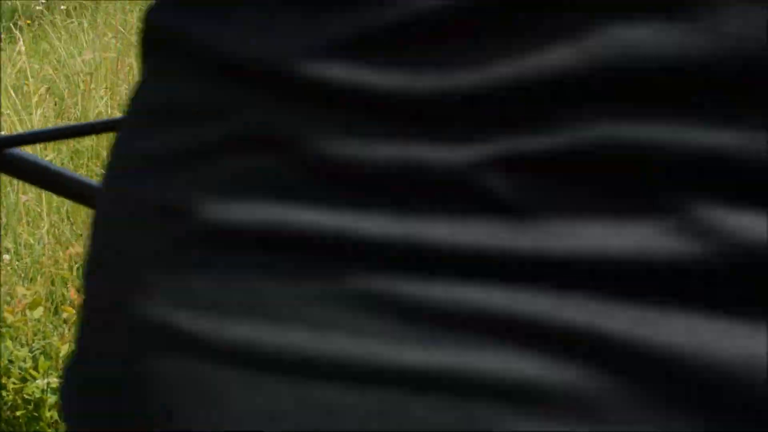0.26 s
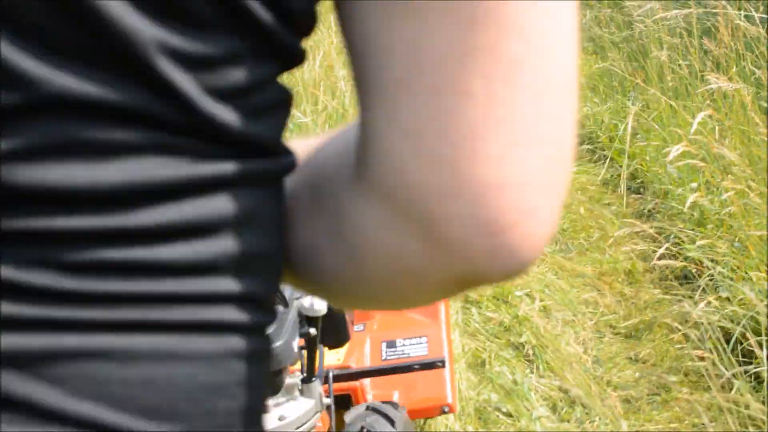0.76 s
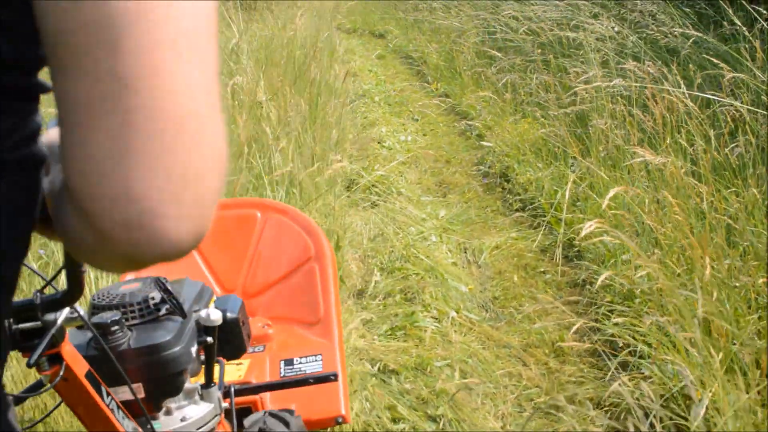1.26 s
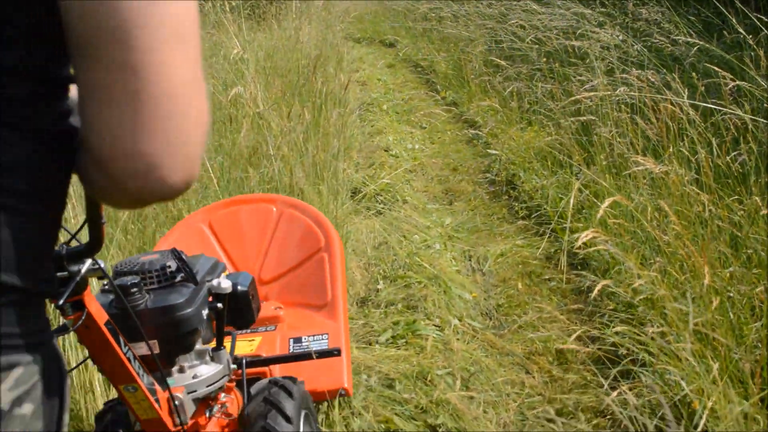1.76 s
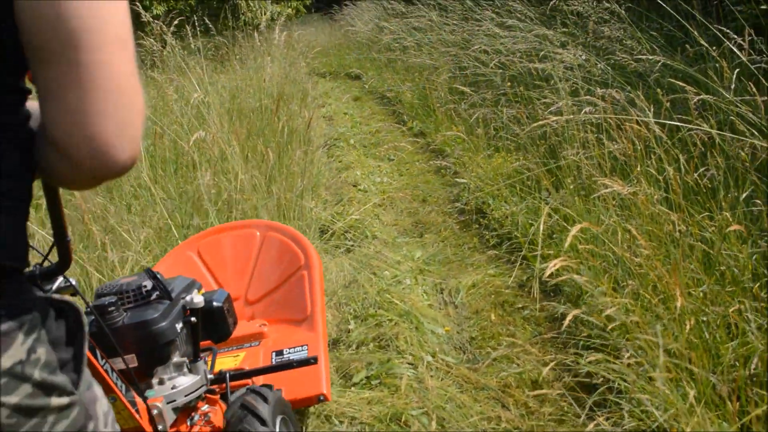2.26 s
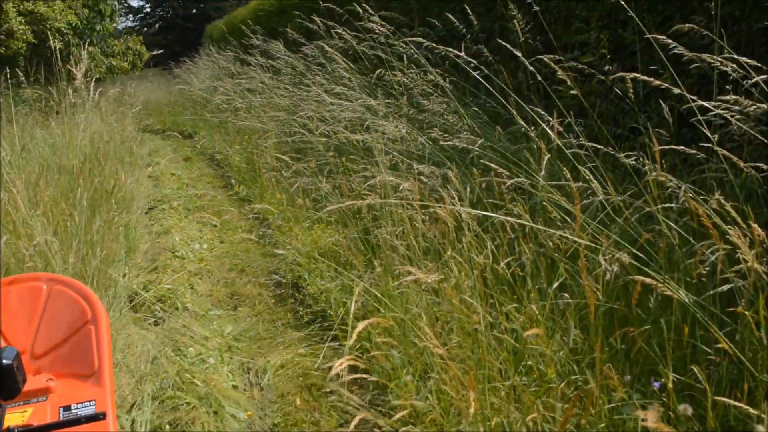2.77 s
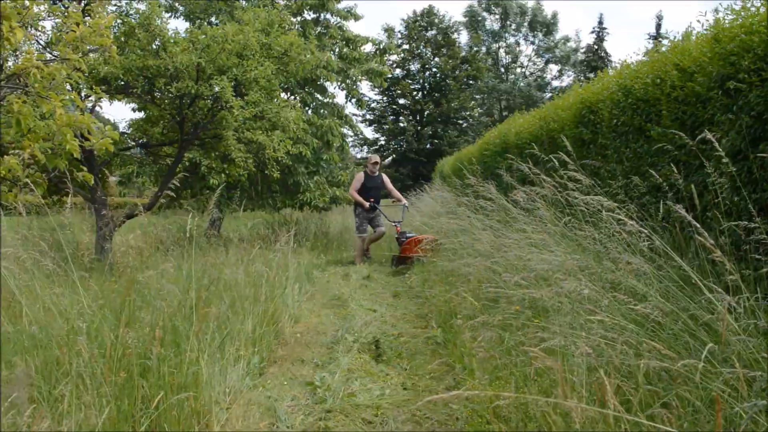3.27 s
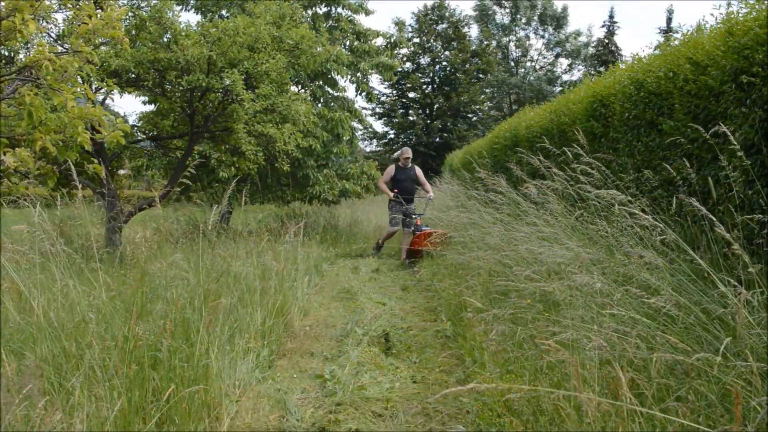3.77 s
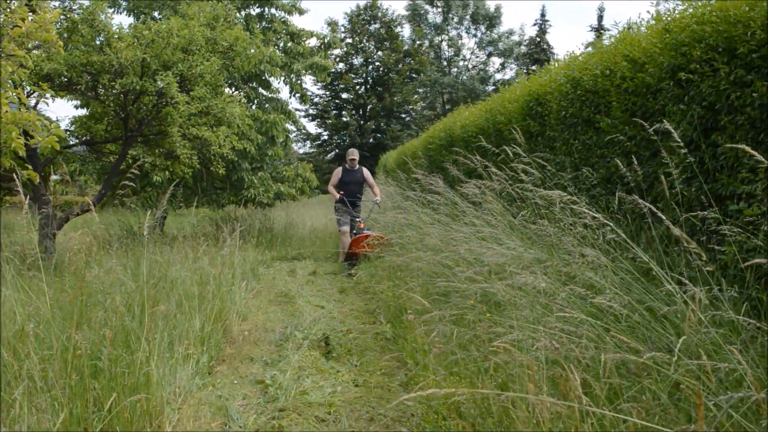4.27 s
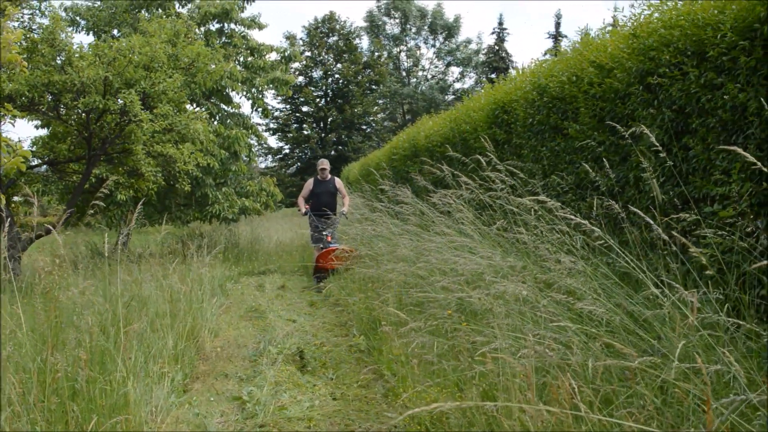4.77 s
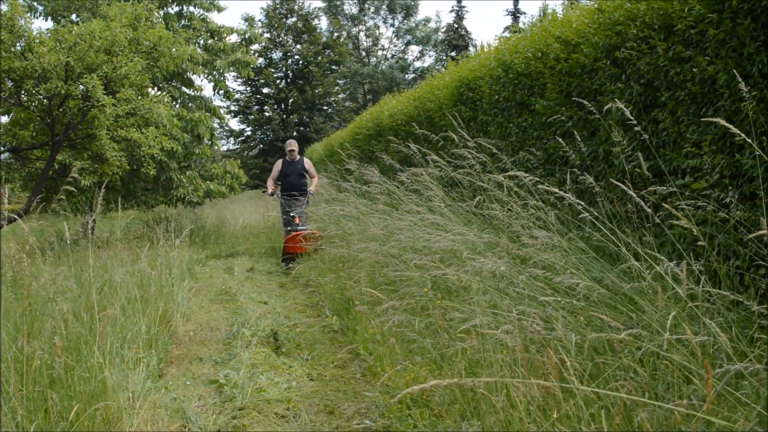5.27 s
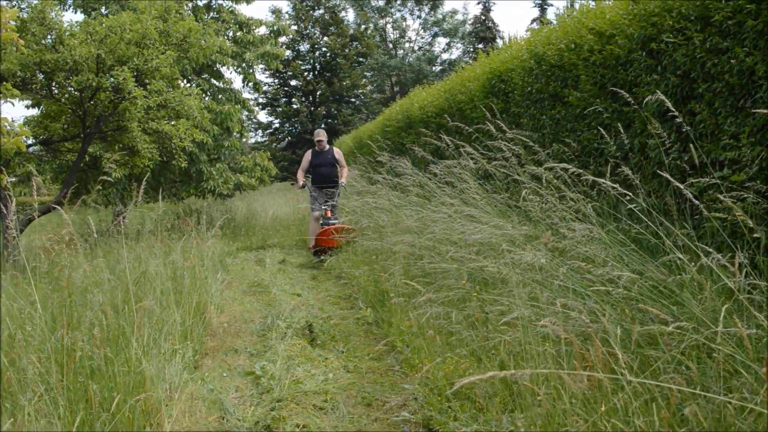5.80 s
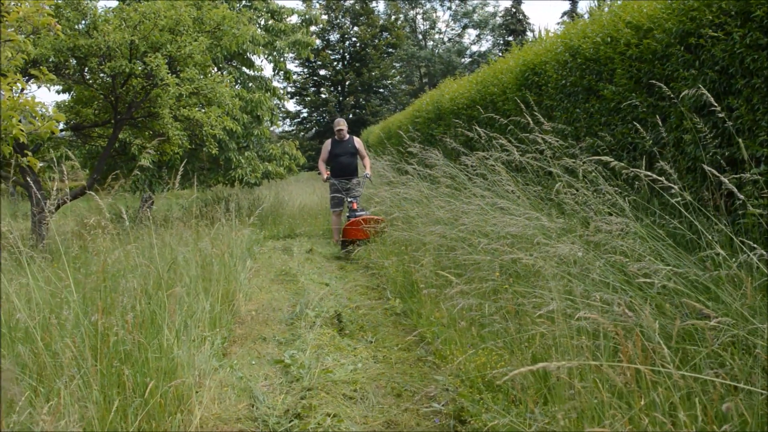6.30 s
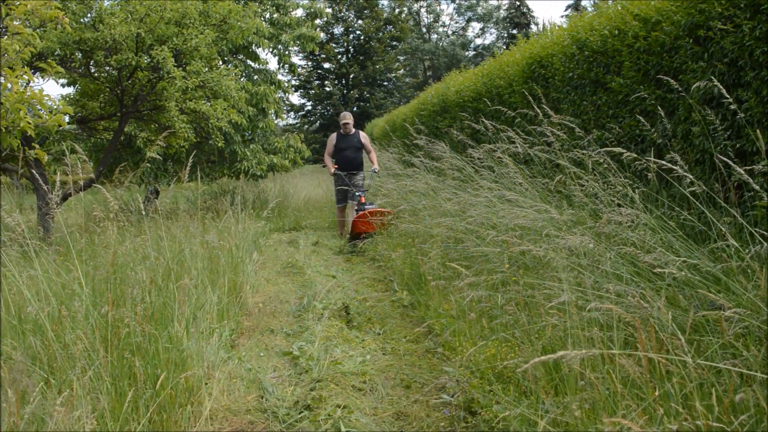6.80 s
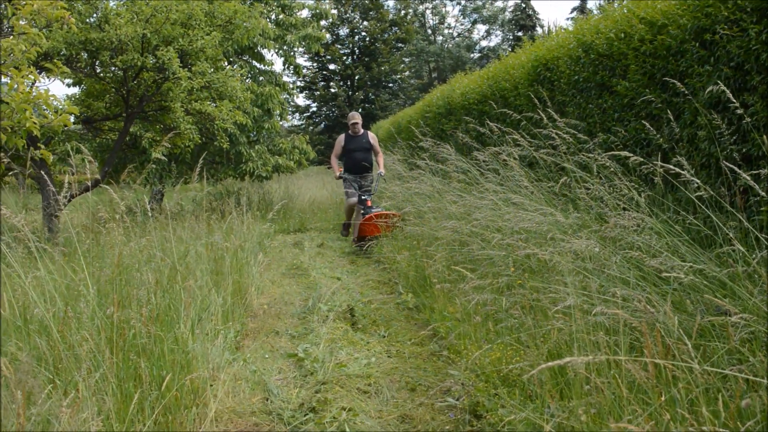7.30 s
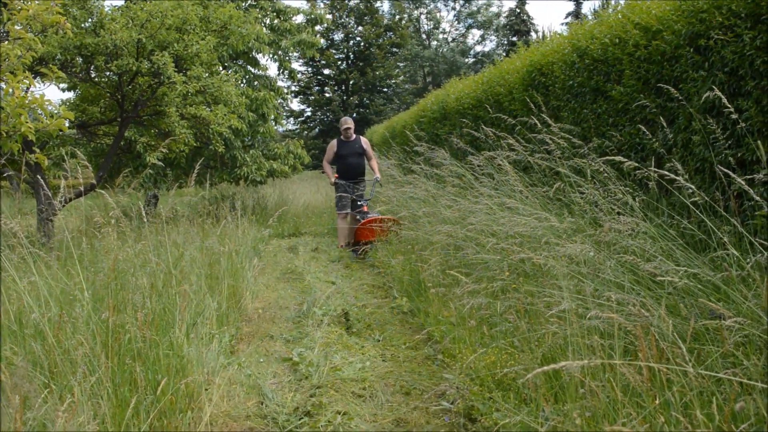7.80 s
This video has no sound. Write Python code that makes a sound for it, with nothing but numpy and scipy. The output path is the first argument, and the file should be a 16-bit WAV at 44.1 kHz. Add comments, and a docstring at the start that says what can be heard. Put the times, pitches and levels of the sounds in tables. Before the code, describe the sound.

A small petrol mower chugs and roars close by through tall grass, deck ringing and stalks ticking, then cuts abruptly to a quieter, distant view walking nearer.

```python
"""A single-cylinder four-stroke mower cuts tall grass, first heard from close behind its driver.
Within a second the driver passes closest, the handlebar buzzes past, and the machine turns away.
After 3.3 s a quick fade moves the listener far down the path, and the mower walks nearer.
Throughout, exhaust thumps ring the muffler, the cooling fan whines, air and blade roar under a steel deck
that rings as stalks strike it, and cut stalks spit and tick in the treble."""
import sys
import numpy as np
from scipy import signal
from scipy.io import wavfile
from scipy.ndimage import uniform_filter1d

SR = 44100
rng = np.random.default_rng(int(sys.argv[2]) if len(sys.argv) > 2 else 0)


def undo_db(level):
    """Turn decibels back into plain size, where 20 dB means ten times bigger."""
    steps = np.asarray(level, float) / 20
    return 10 ** steps


def to_wav(sig):
    """Store sig (one row per channel, or 1-D mono) as 16-bit WAV at the path in sys.argv[1].

    Samples outside -1..1 are clipped; the rate is SR.
    """
    pcm = np.clip(np.atleast_2d(sig), -1, 1) * 32767
    pcm = np.round(pcm).astype(np.int16)
    wavfile.write(sys.argv[1], SR, pcm.T)  # frames by channels


N = 355005


def even(x):
    """Scales to rms 1."""
    return x / np.sqrt(np.mean(x ** 2) + 1e-20)


def read(points, hz):
    """Reads a spectrum on a log-frequency axis, as a column."""
    f, db = np.transpose(points)
    return np.interp(np.log(hz + 1), np.log(f + 1), db)[:, None]


def drift(hz):
    """Slow random signal of rms 1, up to about hz."""
    return even(signal.lfilter(*signal.butter(2, hz, fs=SR), rng.standard_normal(N)))


def strikes(per_s, spread_db):
    """Random clicks of either sign, most small, a few large."""
    size = undo_db(spread_db * np.minimum(rng.exponential(1, N), 5)) * rng.choice([-1, 1], N)
    return size * (rng.random(N) < per_s / SR)


def ring(hz, width_hz, per_s=260):
    """One mode of steel, a dying sine struck at random; rms 1."""
    t = np.arange(4000) / SR
    mode = np.exp(-np.pi * width_hz * t) * np.sin(2 * np.pi * hz * t)
    return even(signal.oaconvolve(strikes(per_s, spread_db=2.77), mode)[:N])


def puff(turns, db, centre=0.17, width=0.35):
    """Gain that swells once a firing cycle, as the exhaust gas rushes out; centre, width in cycles."""
    return 1 + undo_db(db) * np.exp(-.5 * ((turns % 1 - centre) / width) ** 2)


# driver's body in the way: (t/s, share 0-1)
DRIVER_SHADE = [(0, 1.), (.72, 0.9), (.81, 0.06)]


def driver_shade(t):
    """Share of the sound path that the driver's body blocks."""
    return np.clip(np.interp(t, *np.transpose(DRIVER_SHADE)), 0, 1)


NOTCH_HZ, NOTCH_WIDTH_OCTAVES = 730, 0.24
# roar around NOTCH_HZ, dipping and swelling as the ground reflection shifts: (t/s, level change/dB)
NOTCH_LEVEL = [(.5, 2), (1, -11), (1.4, -5), (1.8, -12), (2.2, 1.5), (2.9, 9), (3.4, -2), (4.5, -1.2)]


def noise(colour, patchy_db, shaded=None, notched=False):
    """Random short-time spectra of a given colour with drifting patches, another colour while shaded; rms 1."""
    frames, hz = N // 256 + 5, np.fft.rfftfreq(1024, 1 / SR)
    t = np.arange(frames) * 256 / SR
    real, imag, patches = rng.standard_normal((frames, 513, 3)).T
    patches = uniform_filter1d(patches, size=9, axis=0)  # over frequency
    patches = even(uniform_filter1d(patches, size=10, axis=1))  # over time
    share = driver_shade(t)
    field_db = (1 - share) * read(colour, hz) + share * read(shaded or colour, hz)
    field_db += patchy_db * patches
    if notched:
        notch = np.exp(-.5 * (np.log2((hz + 1) / NOTCH_HZ) / NOTCH_WIDTH_OCTAVES) ** 2)
        field_db += np.outer(notch, np.interp(t, *np.transpose(NOTCH_LEVEL)))
    spectra = (real + 1j * imag) * undo_db(field_db)
    return even(signal.istft(spectra, nperseg=1024, noverlap=768)[1][:N])


TICK_LOW_HZ, TICK_HIGH_HZ = 7660, 10900
# loud stalk snaps: (t/s, peak level/dB)
STALK_TICKS = [(0.8934, -6), (0.9582, -6), (0.9901, -5), (1.2401, -8), (1.4775, -3), (1.5289, -5),
               (1.6616, -6), (1.7215, -6), (2.4059, -7), (2.6868, -6), (3.1418, -8), (5.5643, -10),
               (6.6802, -9)]


def ticks():
    """A thick stalk snaps: a burst of a millisecond, then a short fizz."""
    out, t = np.zeros(N + 800), np.arange(800) / SR
    band = signal.butter(2, [TICK_LOW_HZ, TICK_HIGH_HZ], "band", fs=SR)
    for (s, db), fizz in zip(STALK_TICKS, rng.standard_normal((len(STALK_TICKS), 800))):
        decay = np.exp(-t / .0004) + .15 * np.exp(-t / .004)
        snap = signal.lfilter(*band, fizz * decay)
        out[round(s * SR):][:800] += undo_db(db) * snap / abs(snap).max()
    return out[:N]


def crackle(hiss):
    """The blade cuts stalks in clumps: short spits of hiss over the steady swish."""
    spit = np.exp(-np.arange(300) / SR / 0.00082)
    spits = signal.oaconvolve(abs(strikes(260, spread_db=2.7)), spit)[:N]
    return even(hiss * (1 + .35 * even(spits)) * undo_db(0.8 * drift(21.0)))


# spectral shape of the cut grass, one table a place: (f/Hz, level/dB per Hz)
SWISH_COLOUR = [
    [(2470, -4.5), (4200, -28), (5140, -16), (5740, -10.5), (7510, -3.5), (9710, 3.5), (10800, -1.5),
     (15600, -23)],
    [(2470, -53), (4200, -12), (5030, -5.5), (5680, -14), (6510, -9), (8290, -8.5), (10100, -4.5),
     (12900, -16.5), (15600, -27)],
]
# the same behind the driver's body: (f/Hz, level/dB per Hz)
SWISH_SHADED_COLOUR = [(2470, -48), (4200, -18), (6230, -6.5), (7760, -6), (8420, -1.5), (9660, -1),
                       (11600, -9), (15600, -25)]


def swish(place, crack):
    """Cut grass hisses and crackles, pulsed softly by the exhaust front; rms 1."""
    hiss = noise(SWISH_COLOUR[place], patchy_db=1.5, shaded=SWISH_SHADED_COLOUR)
    return even(crackle(hiss) * crack ** 0.69)


HANDLE_HZ, HANDLE_WIDTH_HZ, HANDLE_DB = 1424, 45, -27
HANDLE_FROM_S, HANDLE_TO_S, HANDLE_RISE_DB_PER_S, HANDLE_FALL_DB_PER_S = 0.5, 0.85, 90, 200


def handlebar(t):
    """The handlebar, one mode of steel, buzzes as it swings past: it swells, holds and stops."""
    away_db = HANDLE_RISE_DB_PER_S * np.maximum(HANDLE_FROM_S - t, 0)
    away_db += HANDLE_FALL_DB_PER_S * np.maximum(t - HANDLE_TO_S, 0)
    return undo_db(HANDLE_DB - away_db) * ring(HANDLE_HZ, HANDLE_WIDTH_HZ, per_s=500)


# faint hums before the deck gain, one table a place: (multiple of crankshaft speed, level/dB)
CRANK_ORDERS = [
    [(10, -14), (11, -15), (12, -15), (32, -14)],
    [(9, -20), (13, -11), (31, -14)],
]


def belt(turns, place):
    """Parts that turn with the crankshaft hum faintly on its multiples, each coming and going."""
    out = 0
    for order, db in CRANK_ORDERS[place]:
        phase = 2 * order * turns + 0.12 * drift(21)  # two crank turns a firing
        out = out + undo_db(db + 3.7 * drift(3.3)) * np.sin(2 * np.pi * phase)
    return out


# steel deck modes before the deck gain: (f/Hz, width/Hz, level/dB)
DECK_MODES = [(1201.5, 20, -5.5), (1733, 51, -12), (1610, 74, -8), (2792, 31, -11.5), (734, 33, -12.5),
              (1987, 26, -10.5), (901, 16, -10.5), (826, 12, -10), (1031, 17, -18), (2420, 51, -23.5),
              (3365, 39, -12.5)]


def deck():
    """Stalks thrown by the blade keep the deck's modes ringing, each in its own bursts."""
    return sum(undo_db(db) * ring(hz, width_hz) for hz, width_hz, db in DECK_MODES)


FINS, FLARE_WIDTH_S = 22, 0.01
# flares of the whine before the deck gain: (t/s, level/dB)
WHINE_FLARES = [(.86, 9), (.995, 11), (1.08, 10.5), (1.3, 2), (1.645, 10.5), (1.83, 5), (1.91, 10.5),
                (2.07, 11), (2.14, 8), (2.28, -2), (2.63, 8), (3.27, 0), (6.22, 3)]
# mean whine before the deck gain, one value a place: level/dB
WHINE_DB = [-.5, -4]
# phase wander of the whine, one value a place: rms/periods
WHINE_WAVER = [.14, .21]


def fan(turns, place):
    """The flywheel's fins pass the cowl: a wavering whine that flares when the cowl rings along."""
    t = np.arange(N) / SR
    flares = sum(undo_db(db) * np.exp(-.5 * ((t - s) / FLARE_WIDTH_S) ** 2) for s, db in WHINE_FLARES)
    level = undo_db(WHINE_DB[place] + 3.8 * drift(14)) + flares
    return level * np.sin(2 * np.pi * (2 * FINS * turns + WHINE_WAVER[place] * drift(25)))


# spectral shape of air and blade, one table a place: (f/Hz, level/dB per Hz)
ROAR_COLOUR = [
    [(290, -49), (500, -37), (538, -5), (622, -20), (790, -7.5), (1070, -6.5), (1190, -7), (1290, -2.5),
     (1620, -11), (1780, -4.5), (2260, -14.5), (2780, -8), (4580, -16), (6000, -14), (7800, -20.5),
     (13200, -120)],
    [(290, -42), (500, -17), (584, -15.5), (712, -4.5), (868, -10), (1090, -7), (1210, -10.5), (1430, -9.5),
     (1760, -3), (2030, -6), (2310, -14.5), (2840, -5.5), (3080, -10.5), (3530, -10), (6000, -21),
     (7800, -16), (13200, -120)],
]
# the same behind the driver's body: (f/Hz, level/dB per Hz)
ROAR_SHADED_COLOUR = [(290, -24), (500, 1.5), (655, -5), (815, -3), (1390, -2), (1670, -2), (3180, -11.5),
                      (4000, -16), (6000, -15), (7800, -41), (13200, -120)]


def roar(turns, place, crack):
    """Air and blade roar under the deck, pulsed by the exhaust and slowly wavering; rms 1."""
    air = noise(ROAR_COLOUR[place], patchy_db=1.47, shaded=ROAR_SHADED_COLOUR, notched=True)
    return even(air * crack * puff(turns, db=-19) * undo_db(0.86 * drift(9)))


# spectral shape of the rumble, one table a place: (f/Hz, level/dB per Hz)
RUMBLE_COLOUR = [
    [(40, -32), (100, -8.5), (220, -9), (340, 4.5), (410, -3), (480, -11), (580, -5), (750, -11),
     (1000, -53)],
    [(40, -20), (100, -1), (200, -3), (320, 2.5), (400, -10.5), (480, -6), (600, -7.5), (750, -25),
     (1000, -50)],
]


def rumble(turns, place):
    """Low noise that swells with each puff of exhaust gas; rms 1."""
    return even(noise(RUMBLE_COLOUR[place], patchy_db=2.5) * puff(turns, db=-3, centre=.33, width=.17))


# muffler chambers, one table a place: (f/Hz, signed strength, t60/s, arrival/ms)
CHAMBERS = [
    [(108.8, -0.092, 0.083, 4.58), (178.4, 0.31, 0.052, 4.8), (224.7, -0.19, 0.078, 1.54)],
    [(108, 0.41, 0.0075, 4), (152.9, -0.15, 0.05, 6.2), (251.2, -0.19, 0.048, 1.56)],
]
# softness of the exhaust valve's release, one value a place: Gaussian sigma/ms
VALVE_SOFTNESS_MS = [0.48, 0.83]
# hum at crankshaft speed against the exhaust, one value a place: level/dB
CRANK_HUM_DB = [-15, -17.5]
# engine block rattle against the exhaust, one value a place: level/dB
RATTLE_DB = [-23, -22.5]


def exhaust(turns, place, jitter_ms=.19, uneven_db=.6):
    """Each firing rings the muffler chambers and shakes the block, a little early or late, weak or strong."""
    at = np.flatnonzero(np.diff(np.floor(turns)))
    late, common, *strength = rng.standard_normal((len(at), 5)).T
    at = np.clip(at + np.round(late * jitter_ms * SR / 1000).astype(int), 0, N - 1)
    t, out, firings = np.arange(5000) / SR, np.zeros(N), np.zeros(N)
    for (hz, size, t60_s, arrival_ms), chance in zip(CHAMBERS[place], strength):
        after = np.maximum(t - arrival_ms / 1000, 0)
        firings[at] = undo_db(uneven_db * (common + .7 * chance))
        chamber = size * undo_db(-60 * after / t60_s) * np.sin(2 * np.pi * hz * after)
        out += signal.oaconvolve(firings, chamber)[:N]
    valve = signal.windows.gaussian(301, VALVE_SOFTNESS_MS[place] * SR / 1000)
    out = signal.oaconvolve(out, valve, "same")
    out = even(signal.lfilter(*signal.butter(1, 60, "high", fs=SR), out))  # short tailpipe radiates little bass
    # the block answers every firing with the same dense dying rattle
    rattle = signal.lfilter(*signal.butter(2, [330, 1600], "band", fs=SR), rng.standard_normal(len(t)))
    rattle = rattle * undo_db(-60 * t / 0.044)
    out += undo_db(RATTLE_DB[place]) * even(signal.oaconvolve(firings, rattle)[:N])
    hum = np.sin(2 * np.pi * (2 * turns + 0.24 + .03 * drift(5)))
    return out + undo_db(CRANK_HUM_DB[place] + drift(6)) * hum


# span of each place: (from/s, to/s)
PLACE_SPANS = [(0, 3.31), (3.32, 8.05)]
# Layer columns below: (exhaust, rumble, roar, deck ring, swish)
# on arriving, one row a place: level/dB
ARRIVAL_DB = [(-20.5, -26, -21, -26.5, -21.5), (-26, -43, -29.5, -33.5, -31.5)]
# turning away when near, walking closer when far, one row a place: trend/dB per s
TREND_DB_PER_S = [(-.6, -1.05, .35, 0.19, -0.34), (.35, 1.42, 0.8, 0.37, 0.87)]
# while the driver stands in the way: level change/dB
SHADED_DB = (-0.5, -0.5, -1.5, -12.5, 0.5)
# as the driver passes closest: level change/dB
CLOSEST_DB = (2.5, 7, -2, 1, -5.5)
CLOSEST_S, NEARING_WIDTH_S = .67, .22
# how slowly that change fades again: Gaussian width/s
LEAVING_WIDTH_S = (.2, .2, .1, .1, .055)
# how strongly each layer follows the grass: factor
GRASS_FOLLOW = (.1, .3, .4, .9, 1.05)
# thickness of the grass under the blade: (t/s, level/dB)
GRASS_THICKNESS = [(0, 0), (1.0, -2), (1.3, -0.1), (1.56, 1), (1.8, -.3), (2.5, .5), (2.75, -0.5),
                   (3.25, .5), (3.4, 1), (3.85, -2), (4.15, 1.5), (4.5, 0), (5.0, .3), (5.6, 0.5),
                   (6.15, 0.5), (6.4, 0.5), (6.7, 0.3), (7.3, -1.5), (7.8, 1.5), (8.05, .8)]


def levels(place, t):
    """Layer gains: a steady trend, changed by the driver's body and the grass; bass lingers behind the driver."""
    width_s = np.where(t < CLOSEST_S, NEARING_WIDTH_S, np.c_[list(LEAVING_WIDTH_S)])
    closest = np.exp(-.5 * ((t - CLOSEST_S) / width_s) ** 2)
    db = np.outer(ARRIVAL_DB[place], np.ones(len(t)))
    db += np.outer(TREND_DB_PER_S[place], t - PLACE_SPANS[place][0])
    db += np.outer(SHADED_DB, driver_shade(t))
    db += np.c_[list(CLOSEST_DB)] * closest
    db += np.outer(GRASS_FOLLOW, np.interp(t, *np.transpose(GRASS_THICKNESS)))
    return undo_db(db)


CRACK_WIDTH_CYCLES, CRACK_DB = .03, -9
# engine speed, one table a place: (t/s, firing rate/Hz)
FIRING_RATE = [
    [(0.0, 27.497), (0.414, 27.042), (0.828, 27.013), (1.241, 27.242), (1.655, 27.203), (2.069, 27.041),
     (2.482, 27.21), (2.896, 27.477), (3.31, 26.953)],
    [(3.32, 27.698), (3.75, 27.979), (4.18, 27.953), (4.61, 27.827), (5.04, 27.816), (5.47, 27.838),
     (5.9, 27.854), (6.33, 27.787), (6.76, 27.835), (7.19, 27.779), (7.62, 27.902), (8.05, 27.959)],
]
# firing phase on arriving, one value a place: cycles
START_CYCLES = [.728, .511]
# sharp front of each exhaust stroke, one value a place: phase/cycles
CRACK_CENTRE = [.175, .125]


def mower(place):
    """All layers from one place, locked to one count of firing cycles."""
    t = np.arange(N) / SR
    turns = np.cumsum(np.interp(t, *np.transpose(FIRING_RATE[place]))) / SR
    turns += START_CYCLES[place] - turns[round(PLACE_SPANS[place][0] * SR)]
    crack = puff(turns, CRACK_DB, CRACK_CENTRE[place], CRACK_WIDTH_CYCLES)
    pipe_gain, rumble_gain, roar_gain, steel_gain, swish_gain = levels(place, t)
    steel = deck() + fan(turns, place) + belt(turns, place)
    return (swish_gain * swish(place, crack)
            + handlebar(t)
            + steel_gain * steel
            + roar_gain * roar(turns, place, crack)
            + rumble_gain * rumble(turns, place)
            + pipe_gain * exhaust(turns, place))


CHANGE_S, CHANGE_FADE_S = 3.312, 0.033


def scene():
    """Near, a quick linear fade, far; stalk ticks on top."""
    far = np.clip((np.arange(N) / SR - CHANGE_S) / CHANGE_FADE_S + .5, 0, 1)
    return ((1 - far) * mower(place=0) + far * mower(place=1) + ticks())[None]


def roll_off(x):
    """The treble ends steeply here."""
    return signal.sosfilt(signal.butter(12, 15710, fs=SR, output="sos"), x)


def record(dry):
    """The microphone drops the deepest bass and the top."""
    heard = signal.lfilter(*signal.butter(1, 35, "high", fs=SR), dry)
    lowpass = signal.firwin(255, 15600, window=("kaiser", 9), fs=SR)
    heard = signal.oaconvolve(heard, lowpass[None], "same")
    return roll_off(heard)


dry = scene()
out = record(dry)
to_wav(out)
```